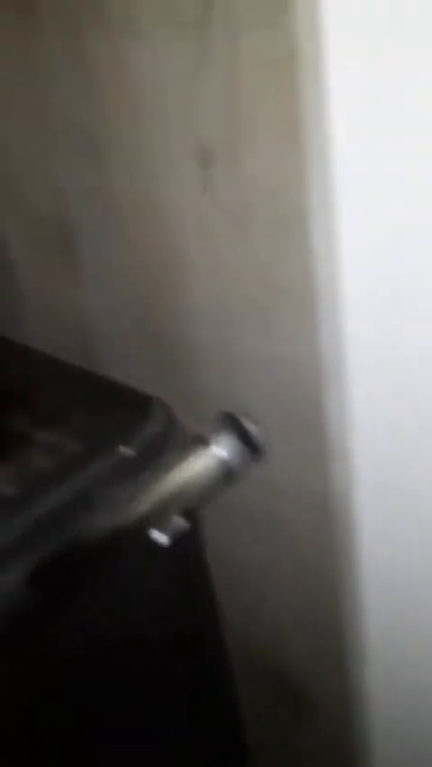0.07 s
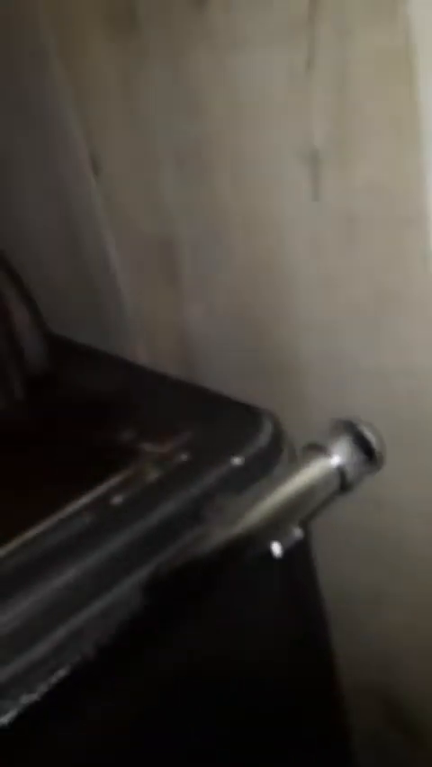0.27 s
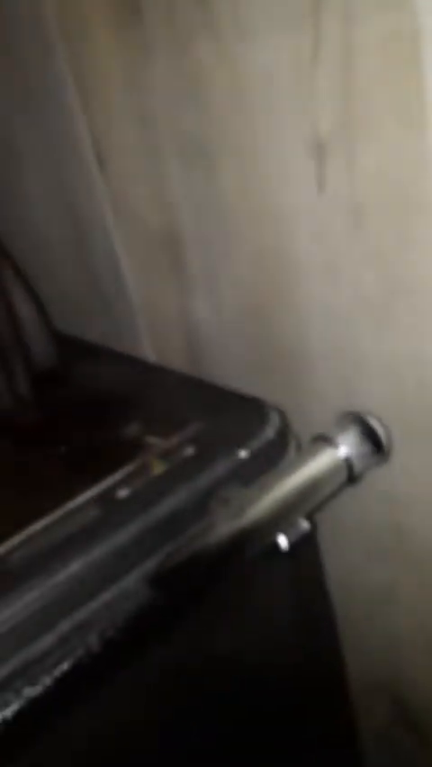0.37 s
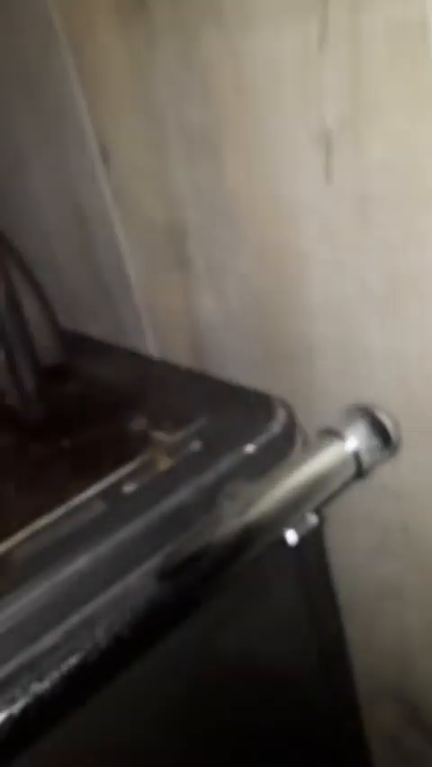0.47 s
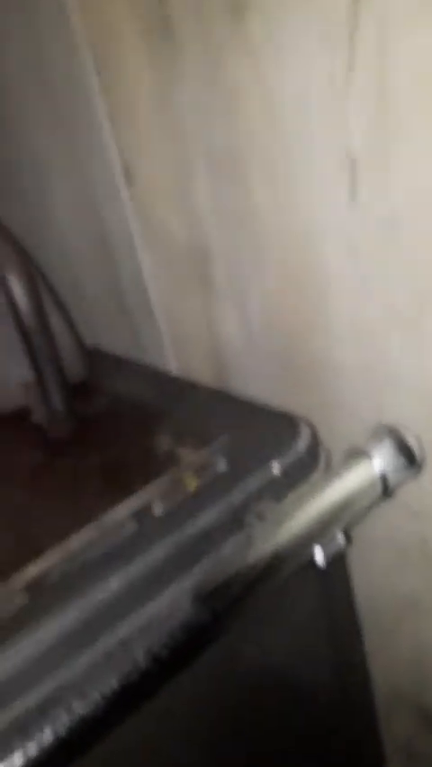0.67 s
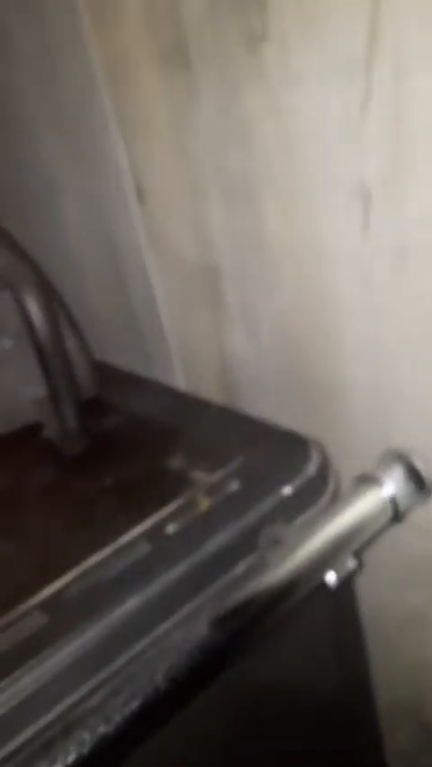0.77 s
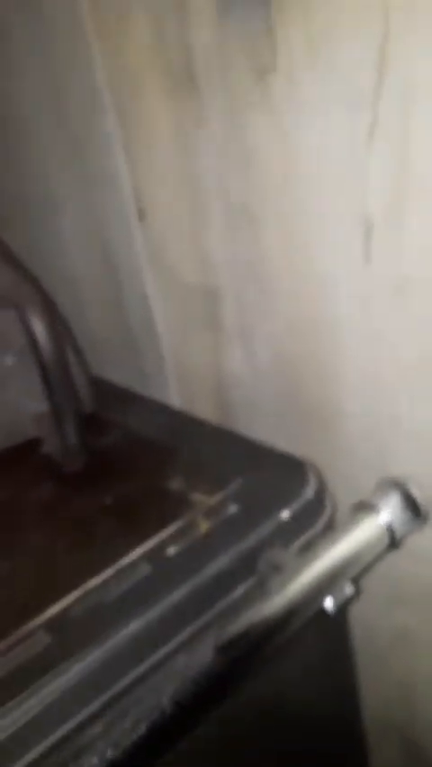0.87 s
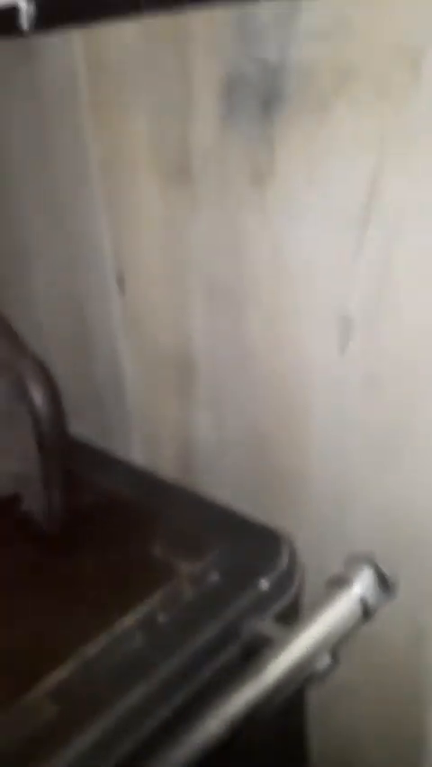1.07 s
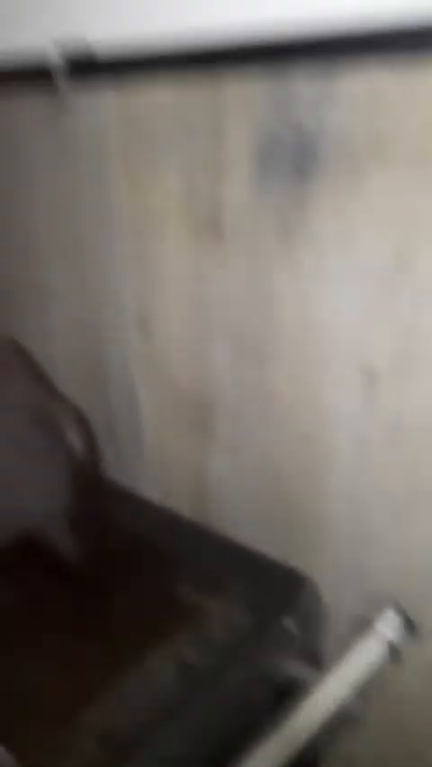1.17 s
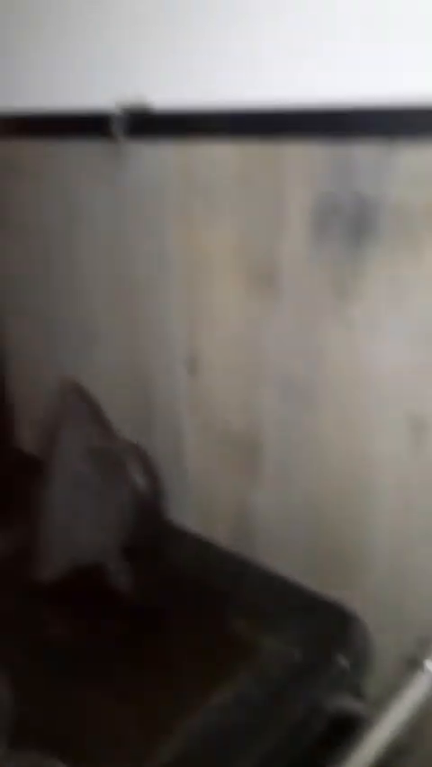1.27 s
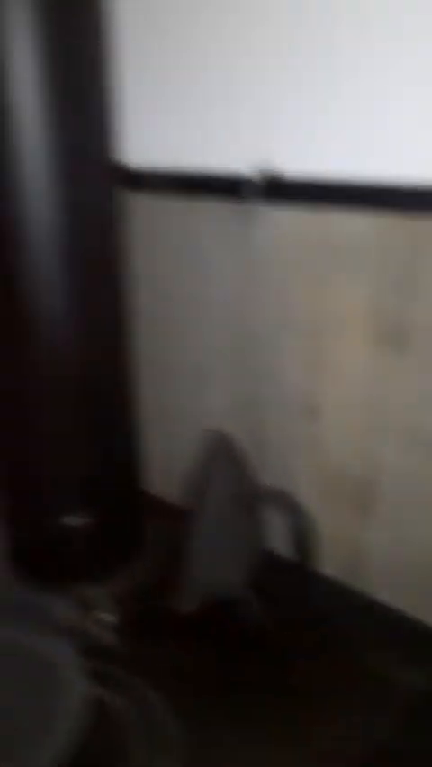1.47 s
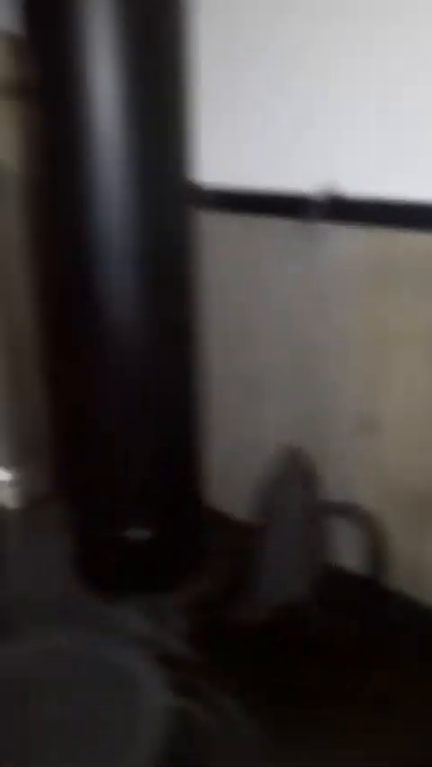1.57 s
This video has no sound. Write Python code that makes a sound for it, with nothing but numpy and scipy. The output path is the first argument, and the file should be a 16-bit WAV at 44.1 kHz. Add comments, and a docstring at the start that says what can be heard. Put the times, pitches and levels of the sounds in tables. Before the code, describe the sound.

Wood pellets poured into a metal tube, swelling to a rush, then trickling off.

```python
"""A small hard room: dry wood pellets slide out of a plastic bowl and rattle into a metal burner tube.
A trickle swells to one big rush, then thins to a few small clumps and last single pellets.
The blows set off a low thrum and the hollow notes of the tube. Two spaced microphones hear the pour
from the right, far enough off that the reflections rival the direct sound."""
import sys
import numpy as np
from scipy import signal
from scipy.fft import rfft, irfft, next_fast_len
from scipy.io import wavfile
from scipy.ndimage import uniform_filter1d

SR = 44100
rng = np.random.default_rng(int(sys.argv[2]) if len(sys.argv) > 2 else 0)


def file_out(sig):
    """Save sig as 16-bit WAV at sys.argv[1]."""
    # one column per channel
    cols = np.atleast_2d(sig).T
    # limit, then scale
    lim = np.clip(cols, -1, 1)
    pcm = np.round(lim * 32767).astype(np.int16)
    wavfile.write(sys.argv[1], SR, pcm)


N = 70560
T = np.arange(N) / SR
FFT_SIZE = next_fast_len(N + SR // 2, real=True) // 2 * 2
HZ = np.fft.rfftfreq(FFT_SIZE, 1 / SR)


def amp(db):
    """Decibels to gain."""
    return 10 ** (np.asarray(db) / 20)


def unit(x):
    """Scaled to rms 1."""
    return x / np.sqrt(np.mean(np.abs(x) ** 2) + 1e-20)


def along(points, hz):
    """(f/Hz, value) points interpolated on a log axis."""
    f, values = np.transpose(points)
    return np.interp(np.log(hz + 1), np.log(f + 1), values)


def curves(rows):
    """One value per sample for each column after the time."""
    times, *columns = np.transpose(rows)
    return [np.interp(T, times, column) for column in columns]


def filtered(x, response):
    """x through a frequency response."""
    return irfft(rfft(x, FFT_SIZE) * response, FFT_SIZE)[..., :N]


def colour(points):
    """Causal response of unit power with the given spectral shape."""
    cepstrum = irfft(np.log(amp(along(points, HZ))))
    cepstrum[1:FFT_SIZE // 2] *= 2
    cepstrum[FFT_SIZE // 2 + 1:] = 0
    return unit(np.exp(rfft(cepstrum)))


def resonator(modes):
    """Causal response of unit power of a set of resonances, falling steeply outside them."""
    peaks = sum(amp(db) * 1j * HZ * width / (hz * hz - HZ ** 2 + 1j * HZ * width)
                for hz, width, db in modes)
    low, high = 1j * HZ / (.72 * modes[0][0]), 1j * HZ / (1.3 * modes[-1][0])
    highpass = low ** 2 / (1 + low + low ** 2)
    lowpass = 1 / (1 + high + high ** 2)
    return unit(peaks * highpass * lowpass)


def steadied(x, span_s):
    """x with its slow level held at rms 1."""
    return x / np.sqrt(np.abs(uniform_filter1d(x * x, int(span_s * SR))) + 1e-12)


# Spectrum of the room tone: f/Hz, relative level/dB
ROOM_TONE = [(30, -1), (90, -10), (200, 8), (450, 23), (3000, -38), (15000, -50)]


def room_tone():
    """Faint steady noise, separate at each microphone."""
    return amp(-62) * filtered(rng.standard_normal((2, N)), colour(ROOM_TONE))


# Decay of the room's tail: f/Hz, t60/s
ROOM_DECAY = [(150, 0.074), (600, 0.36), (2500, 0.41), (7000, 0.36), (15000, 0.027)]
# How alike the reflections are at the two microphones: f/Hz, correlation
MIC_COHERENCE = [(100, .98), (200, .92), (320, .7), (600, .25), (1400, .15), (3000, 0)]
# Balance across the pair: f/Hz, left minus right/dB
MIC_BALANCE = [(100, -1.8), (600, 2.9), (2000, 0.2), (3300, 1.3), (5200, -0.67), (7000, -0.99),
               (14000, -1.7)]


def room(x, wet_db, left_lag_s=.00039, walls_decay_s=.0043):
    """The direct sound reaches the right microphone first; near walls and a short tail follow."""
    hz, t, bands = signal.stft(rng.standard_normal((2, SR // 2)), SR, nperseg=256)
    decay = np.exp(-np.log(1000) * t / along(ROOM_DECAY, hz)[:, None])
    tail = signal.istft(bands * decay, SR, nperseg=256)[1]
    tail *= amp(-4.5) / np.linalg.norm(tail[0])
    t = np.arange(tail.shape[1]) / SR
    walls = rng.standard_normal(tail.shape) * np.exp(-t / walls_decay_s)
    walls *= amp(-1) / np.linalg.norm(walls[0])
    reflections = amp(wet_db) * (t > .001) * (tail + walls)
    angle = np.arccos(along(MIC_COHERENCE, HZ)) / 2
    mid, side = rfft(reflections, FFT_SIZE) * [np.cos(angle), np.sin(angle)]
    left_right = np.array([[.5], [-.5]])
    direct = np.exp(-2j * np.pi * HZ * left_lag_s * left_right)
    paths = direct + np.array([mid + side, mid - side])
    power = uniform_filter1d(np.mean(np.abs(paths) ** 2, axis=0), size=250)
    balance = amp(along(MIC_BALANCE, HZ) * left_right)
    return filtered(x, paths / np.sqrt(power) * balance)


def contacts(level_db, crowding=.55, spread_db=3.5, decay_s=.00059):
    """Energy of random pellet contacts, mean 1: a stronger flow has more of them."""
    hits_per_s = 170 * amp(2 * crowding * (level_db + 30))
    gaps, sizes = -np.log(rng.random((4000, 2))).T
    onsets = np.searchsorted(np.cumsum(hits_per_s) / SR, np.cumsum(gaps))
    strengths = amp(2 * spread_db * np.minimum(sizes, 3))
    hits = np.bincount(onsets, strengths, N + 1)[:N]
    energy = signal.lfilter([1], [1, -np.exp(-1 / (decay_s * SR))], hits)
    return steadied(np.sqrt(energy), span_s=.069) ** 2


def patter(energy, rub):
    """White noise that follows the contacts, with a share of steady rubbing between them."""
    return np.sqrt((1 - rub) * energy + rub) * rng.standard_normal(N)


# Resonances of the thrum and the tube's two hollow notes: f/Hz, width/Hz, relative level/dB
THRUM_MODES = [(98, 18, -8), (126, 20, -4), (171, 18, 0), (200, 16, -7), (230, 18, -5)]
LOWER_MODES = [(264, 20, -11), (308, 14, 0), (335, 16, -6)]
UPPER_MODES = [(400, 40, -12), (485, 26, -6), (542, 20, -5), (590, 18, 0), (630, 18, -2)]
# How strongly they answer, before trim: t/s, thrum/dB, lower note/dB, upper note/dB
BODY_LEVELS = [(0, -65, -49, -43.5), (.09, -39, -53, -40), (.3, -40, -42, -40), (.385, -42.5, -59, -36.5),
               (0.442, -22.5, -47, -35.5), (.55, -29, -26.5, -27.5), (.69, -30, -29.5, -38.5),
               (.8, -42, -42, -38), (.92, -49, -40.5, -69), (1, -51.5, -33, -40), (1.148, -38, -32, -39),
               (1.26, -54.5, -55, -35.5), (1.38, -73, -59, -42), (1.6, -73.5, -80, -60.5)]


def tube_body(trims_db=(0, -3, -2)):
    """The patter keeps the low thrum and the two hollow notes of the tube ringing."""
    rattle_db, _ = curves(POUR)
    mode_sets = THRUM_MODES, LOWER_MODES, UPPER_MODES
    layers = []
    for modes, level_db, trim_db in zip(mode_sets, curves(BODY_LEVELS), trims_db):
        ring = filtered(patter(contacts(rattle_db), rub=.37), resonator(modes))
        layers.append(steadied(ring, span_s=.031) * amp(level_db + trim_db))
    return layers


# Clear notes struck from the tube: t/s, f/Hz, level before trim/dB, t60/s
TUBE_PINGS = [(.299, 4200, -38, .04), (.594, 3080, -14, .04), (.799, 885, -38, .12), (.838, 880, -24, .12),
              (.838, 334, -25, .13), (.92, 320, -37, .1), (.975, 125, -41, .3), (1.1, 310, -31, .12),
              (1.14, 125, -34, .35), (1.222, 590, -26, .13), (1.315, 6150, -37, .02), (1.549, 565, -40, .1)]


def pings(trim_db=1, waver_rad=.3):
    """Now and then one pellet rings the metal with a short, slightly rough note."""
    out = np.zeros(N)
    for start, hz, db, t60 in TUBE_PINGS:
        t = np.maximum(T - start, 0)
        waver = waver_rad * unit(uniform_filter1d(rng.standard_normal(N), size=round(10 * SR / hz)))
        envelope = (1 - np.exp(-t * hz / 2)) * np.exp(-np.log(1000) * t / t60)
        out += amp(db + trim_db) * envelope * np.sin(2 * np.pi * hz * t + waver)
    return out


# Clumps and single pellets that land harder, before trim:
# t/s, clack/dB, bright tick/dB, tube ring/dB, decay of the scatter/s
HARD_LANDINGS = [(.033, -38.5, -58, -54, 0.041), (.057, -32, -50, -43, 0.026),
                 (.180, -29.5, -51, -48, 0.0038), (.281, -33.5, -39, -32.5, 0.011),
                 (.390, -25.5, -42, -50, 0.017), (.422, -20, -23, -40, 0.002),
                 (.428, -20.5, -29.5, -19.5, 0.011), (.557, -27, -24, -35, 0.0031),
                 (.585, -20, -26, -21, .012), (.659, -24.5, -28.5, -17, 0.0043),
                 (.798, -31.5, -33.5, -47, 0.0045), (.814, -26, -38, -28, 0.0059),
                 (.837, -29, -46, -47, 0.011), (.963, -31.5, -31, -56, 0.0029),
                 (.980, -25, -26.5, -22, 0.002), (1.042, -23.5, -26, -24, 0.0016),
                 (1.085, -23.5, -51.5, -47, 0.0032), (1.123, -51, -52, -22, 0.0054),
                 (1.216, -29.5, -39.5, -23.5, 0.0046), (1.314, -33, -27, -42.5, 0.001),
                 (1.367, -33, -52.5, -43, 0.0027), (1.390, -35, -57, -38.5, 0.0034),
                 (1.455, -31.5, -51, -29.5, 0.0011), (1.549, -37.5, -55, -33.5, 0.0012)]


def clumps(spot, spots, first_blow=.35, trim_db=7.5):
    """A first blow and a quick scatter of contacts: one spot's drives for clack, tick and tube ring."""
    drives = np.zeros((3, N + SR))
    t = np.arange(SR // 10) / SR
    stretch = np.array([[1], [1], [2.97]])  # the tube is shaken longer than the clack lasts
    for start, *levels_db, decay_s in HARD_LANDINGS[spot::spots]:
        envelope = np.sqrt((1 - first_blow) / stretch) * np.exp(-t / (decay_s * stretch))
        scatter = envelope * rng.standard_normal((3, len(t)))
        scatter[:2, 0] = np.sqrt(first_blow * min(decay_s, .004) * SR / 2)  # clack and tick only
        onset = round(start * SR)
        drives[:, onset:onset + len(t)] += scatter * amp(levels_db)[:, None] * amp(trim_db)
    return drives[:, :N]


# The flow from bowl to tube, before trim: t/s, rattle/dB, sliding hiss/dB
POUR = [(0, -42.5, -45), (.025, -39, -46.5), (.065, -30, -42.5), (.16, -34, -46.5), (.255, -35.5, -51),
        (.29, -31.5, -52), (.37, -37, -52), (.418, -29, -44), (.435, -20, -39), (.53, -19.5, -36),
        (.61, -18, -29), (.675, -22, -37), (.72, -30, -43.5), (.78, -35.5, -46), (.85, -27, -46),
        (.895, -33, -54), (.95, -33, -52.5), (1.025, -37, -45), (1.095, -29.5, -38.5), (1.17, -32, -40),
        (1.28, -42.5, -56.5), (1.42, -50, -64), (1.6, -56.5, -70)]


def stream():
    """Pellets clack on one spot and hiss as they slide: two drives that share the same contacts."""
    rattle_db, hiss_db = curves(POUR)
    energy = contacts(rattle_db)
    clack = patter(energy, rub=0) * amp(rattle_db - 1.2)
    slide = patter(energy, rub=.22) * amp(hiss_db - 1)
    return np.array([clack, slide])


# Spectra of a landing pellet, its bright tick and the sliding: f/Hz, relative level/dB
CLACK_SPECTRUM = [(70, -20), (200, -32.5), (330, -13.5), (440, 0), (780, 2.5), (1130, -0.5), (1500, 0),
                  (2000, 3), (2700, -7), (3150, -4.5), (4200, -5.5), (5200, -13), (6200, -11.5),
                  (8000, -25.5), (11000, -58)]
TICK_SPECTRUM = [(500, -111), (2000, -5), (4000, 5.5), (6000, -5.5), (8500, -5.5), (9700, -22),
                 (12000, -14.5), (15500, -20)]
SLIDE_SPECTRUM = [(2500, -79), (5000, 2.5), (6500, -10), (8500, -0.5), (9600, -13), (11500, -5.5),
                  (14000, -9), (16000, -21.5)]


def pellets(spots):
    """Pellets land on several spots, each with its own paths through the room to the microphones."""
    responses = np.array([colour(CLACK_SPECTRUM), colour(SLIDE_SPECTRUM),
                          colour(TICK_SPECTRUM), resonator(UPPER_MODES)])
    out = np.zeros((2, N))
    for spot in range(spots):
        clack, slide = stream() / np.sqrt(spots)
        knock, tick, ring = clumps(spot, spots)
        drives = np.array([clack + knock, slide, tick, ring])
        out += room(filtered(drives, responses).sum(axis=0), wet_db=2)
    return out


def scene():
    """Tube and pellets as the pair hears them, over the room tone."""
    background = room_tone()
    thrum, lower, upper = tube_body()
    pour = pellets(spots=4)
    tube = room(thrum + lower, wet_db=-6) + room(upper + pings(), wet_db=-2)
    return background + tube + pour


def record(dry, top_hz=15700):
    """Both channels are cut off above the band limit."""
    return filtered(dry, HZ < top_hz)


dry = scene()
out = record(dry)
file_out(out)
```